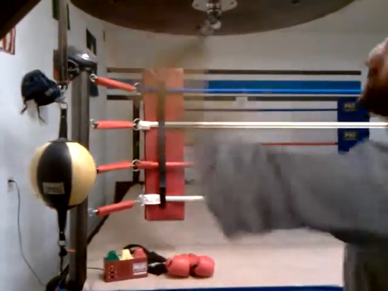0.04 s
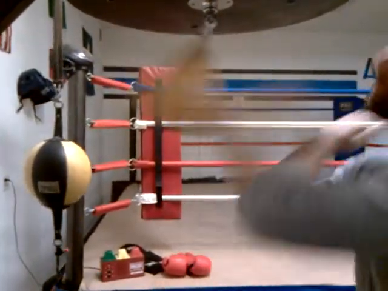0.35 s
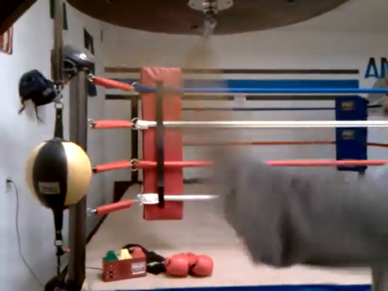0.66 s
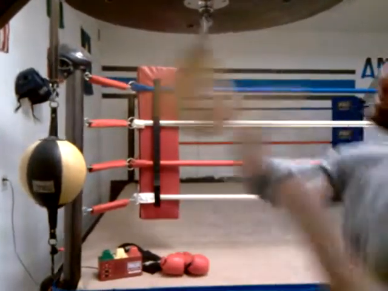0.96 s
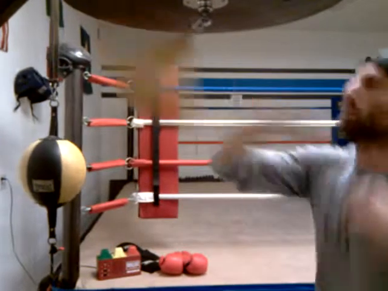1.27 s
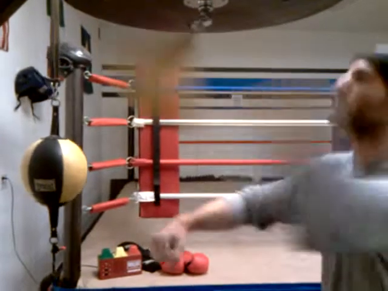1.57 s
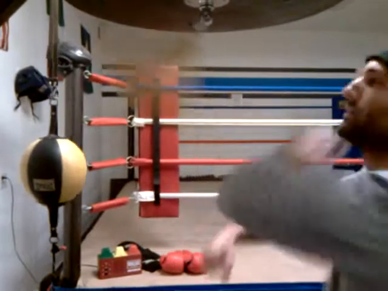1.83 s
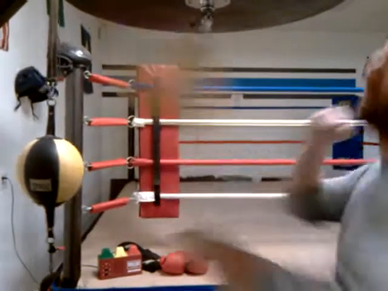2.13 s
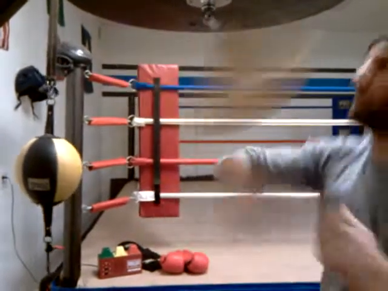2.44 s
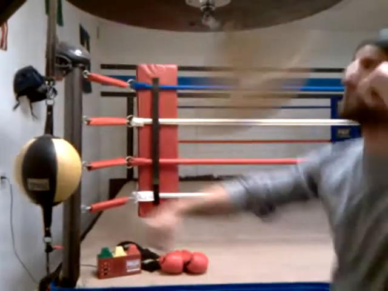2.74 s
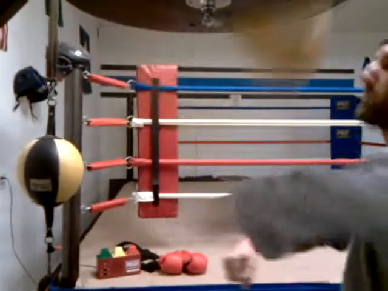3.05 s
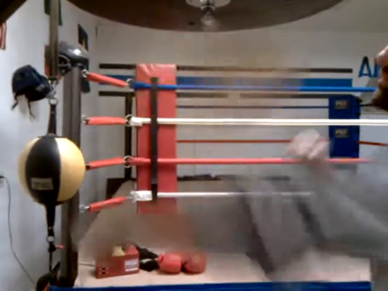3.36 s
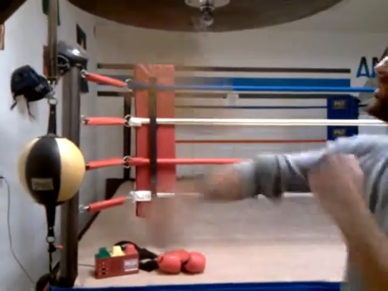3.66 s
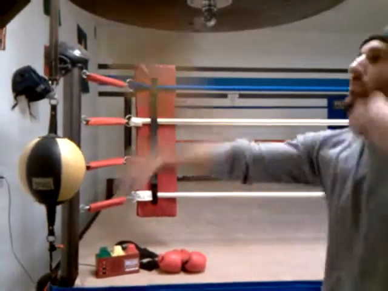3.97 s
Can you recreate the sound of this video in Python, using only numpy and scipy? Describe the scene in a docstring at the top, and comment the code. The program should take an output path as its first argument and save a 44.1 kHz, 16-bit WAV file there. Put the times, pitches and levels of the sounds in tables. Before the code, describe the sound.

Close to the microphone, a speed bag drums against its wooden platform in a fast, even rhythm: a punch, a rattling slam, two softer bounces. Its swivel squeaks now and then, and the gym reverberates over a low rumble.

```python
"""Speed bag in a boxing gym

Close up, from a small camera's microphone: a speed bag is punched about three times a second.
After each punch it strikes the wooden platform three times: a slam that rattles the mount, then
two lighter rebounds. The swivel clatters and squeaks, and the room answers over a low rumble.
The narrow-band recorder overloads on the hardest blows."""
import sys
import numpy as np
from scipy import signal
from scipy.fft import rfft, irfft
from scipy.io import wavfile
from scipy.ndimage import uniform_filter1d, map_coordinates

SR = 44100
rng = np.random.default_rng(int(sys.argv[2]) if len(sys.argv) > 2 else 0)


def wav_out(sig):
    """Save sig, one row per channel (or a flat mono array), as 16-bit PCM at SR to the path in sys.argv[1]."""
    wavfile.write(sys.argv[1], SR, np.round(np.clip(np.atleast_2d(sig).T, -1, 1) * 32767).astype(np.int16))


N = 176400

# spectra of the background rumble and of the room's tail (f/Hz, level/dB)
RUMBLE_EQ = [(20, -4), (50, -3.5), (80, 2.5), (120, -15.5), (300, -4), (1000, -11.5), (3500, -36)]
ROOM_EQ = [(25, -24), (55, -7), (76, -6.5), (110, -1.5), (200, -2.5), (340, 1.5), (480, 2.5), (900, 2),
           (1600, -1), (2100, 2), (2700, -1.5), (3300, 1), (4000, -4.5)]
# reflections off nearby surfaces (delay/s, bass/dB, treble/dB)
REFLECTIONS = [(.0082, -40, -12.5), (0.0147, -39, -13), (0.016, -25.5, -19.5), (0.0302, -18, -39),
               (0.0365, -9.5, -39), (0.0638, -14.5, -28)]
# small clatters: the swivel as the bag swings back, and twice a second knuckle contact
# just after a punch (t/s, level/dB)
SMALL_CLATTERS = [(.53, -16), (.7, -16.5), (.836, -22.5), (1.005, -20.5), (1.159, -22.5), (1.478, -23),
                  (1.808, -19), (2.125, -22.5), (2.453, -25.5), (2.789, -26.5), (3.119, -28.5),
                  (3.443, -22.5), (3.777, -27.5)]
# swivel squeaks (t/s, length/s, f/Hz, level/dB)
SWIVEL_SQUEAKS = [(0.543, 0.032, 3300, -19.5), (0.759, 0.015, 3375, -11), (0.98, 0.014, 2202, -10),
                  (1.62, 0.0075, 2288, -18), (2.252, 0.012, 2340, -22), (2.814, 0.018, 3300, -15.5),
                  (3.583, 0.01, 2200, -13.5), (3.587, 0.014, 3180, -21), (3.837, 0.0081, 2340, -21),
                  (3.946, 0.022, 2346, -20)]
# fist on bag, relative levels (t/s, thump/dB, smack/dB, hollow knock/dB)
FIST_HITS = [(0.0628, -14.5, -24, -10), (0.3668, -14.5, -20.5, -16), (0.6855, -12, -20, -19),
             (0.988, -14.5, -17, -11), (1.3128, -16, -18.5, -14), (1.6442, -13.5, -18.5, -16),
             (1.969, -13.5, -23.5, -27), (2.2826, -15, -18.5, -10), (2.6167, -13.5, -19.5, -16),
             (2.9544, -15, -13, -22.5), (3.2844, -13, -18, -11.5), (3.595, -16, -22, -40),
             (3.9556, -14.5, -19, -9)]
# bag on platform, relative levels (t/s, thump/dB, slap/dB, mount rattle/dB)
BOARD_HITS = [(-0.0045, -16, -9.5, -25.0), (0.0887, -3, -9.5, -13.5), (0.175, -10, -8, -20.5),
              (0.2937, -16, -10.5, -24), (0.401, -3.5, -7.5, -10.5), (0.487, -10.5, -9, -22.5),
              (0.61, -16.5, -10, -25.5), (0.7163, -2.5, -7.3, -11.5), (0.7983, -9, -8.5, -19),
              (0.9104, -15, -8.7, -26), (1.027, -3.5, -7.5, -12), (1.116, -10, -6.5, -21.5),
              (1.2416, -18.5, -8.5, -27.5), (1.3452, -4, -8, -10.5), (1.438, -9.4, -7, -26),
              (1.5702, -16.2, -11.5, -30.5), (1.6762, -4, -6.5, -12), (1.7677, -10.5, -8.2, -21),
              (1.897, -15.5, -10, -28.5), (1.9974, -3.5, -8.5, -13), (2.0828, -10, -12.5, -20.5),
              (2.2032, -19, -6, -29), (2.3229, -5.2, -5.5, -13), (2.4128, -9, -8, -23),
              (2.54, -17.1, -7, -28), (2.652, -5, -4.5, -13), (2.7471, -10, -7, -22.5),
              (2.8823, -17, -9, -34), (2.9834, -5, -4, -14), (3.0757, -8.5, -8.5, -22),
              (3.2074, -16.8, -9.5, -28.5), (3.3141, -2.5, -10, -10.5), (3.399, -10, -9.5, -20.5),
              (3.5174, -14.5, -7.5, -31), (3.6358, -7.5, -6, -16), (3.741, -13, -10, -23.5),
              (3.8841, -20.5, -11, -29.5), (3.9842, -5.5, -7.5, -11.5)]
# modes of the bag's air, its shell, the board, and the longer-ringing mount (f/Hz, level/dB, T60/s)
BAG_AIR_MODES = [(92.8, -2, 0.076), (119, 6.5, 0.02)]
SHELL_MODES = [(380, -1.6, 0.023), (640, -0.77, 0.028)]
BOARD_MODES = [(104.5, -1.5, 0.08), (186.8, 3.5, 0.03), (232.8, -11, 0.056)]
MOUNT_RINGS = [(268, 2, .2), (440, -3, .09), (500, -1, .22), (645, -5, .15), (986, -5, .12),
               (1505, -3, .15), (2018, -4, .12), (2370, -5, .12), (2940, -5, .12), (3238, -1, .15)]
# spectra of fist on leather, leather on wood, loose hardware, mount on its stop (f/Hz, level/dB)
SMACK_EQ = [(100, -3.5), (300, -0.5), (520, -4.5), (720, -0.5), (1250, -7), (1900, 3), (2700, -8),
            (3300, -0.5), (3800, -7)]
SLAP_EQ = [(100, -22.5), (300, -1.5), (520, -1), (950, -4), (1300, -1.5), (1750, 1), (2700, 1.5), (3300, 2),
           (3800, 2)]
RATTLE_EQ = [(100, -15.5), (200, 0.5), (270, 6), (345, -2), (490, 3), (750, -3), (1050, 1.5), (1700, 0),
             (2700, -2.5), (3280, 3), (3800, -5)]
CLACK_EQ = [(300, -9), (1500, -9.5), (2500, 3), (3300, 3)]
# response of the microphone, and of the recorder after it clips (f/Hz, gain/dB)
MIC_EQ = [(100, 1), (3450, 2), (3700, 1), (3900, -14.5), (4250, -16), (4550, -44), (5200, -59),
          (8000, -89.5)]
RECORDER_EQ = [(100, 0.73), (4000, -1), (5000, -5), (6300, -5.5), (8000, -3), (12000, -4.5)]

LEAD_S = 0.3  # run-in before the scene opens
T = np.arange(int(0.4 * SR)) / SR  # time within one hit
RUMBLE_DB, ECHO_DRIFT_S = -33.5, 0.0003
ROOM_DB, ROOM_T60_S, ROOM_BUILD_S, ROOM_SHIFT_S = -7.5, 0.75, 0.0075, 0.1
BOOM_HZ, BOOM_T60_S, BOOM_DB = 107.5, 0.36, -5.5  # standing wave of the room
CLICKS_PER_S, SQUEAK_SAG, SQUEAK_WOBBLE = 2500, 0.02, 0.044
PUNCH_DB, SMACK_DB, SMACK_TAIL_DB = -1, 5.5, 3
THUMP_DB, SLAP_DB, RING_DB, RATTLE_DB = -2.5, 1, -28.5, 2
SWAY_HZ, SWAY_T60_S, SWAY_DB = 35, 0.17, -35  # the whole platform on its bracket
SLAP_HOLD_S, SLAP_DECAY_S, SLAP_TILT_DB = 0.002386, 0.0012, 0.5
SQUASH_S = 0.0042  # a hard blow flattens the bag, so its slap dies more slowly
RATTLE_DELAY_S, CLACK_DELAY_S, CLACK_DECAY_S = 0.0055, 0.011, 0.0019
LOW_CUT_HZ, TOP_HZ, CLIP_DB, CLIP_HARDNESS = 29, 15800, -3.3, 16


def undb(db):
    """Decibels to gain."""
    return 10 ** (np.asarray(db) / 20)


def unit(x, span_s):
    """Scale to rms 1 over the opening span."""
    return x / np.sqrt(np.mean(x[:int(span_s * SR)] ** 2) + 1e-12)


def add(track, s, x):
    """Mix a sound in at s seconds after the run-in."""
    i = int((s + LEAD_S) * SR)
    part = x[:max(len(track) - i, 0)]
    track[i:i + len(part)] += part


def through(x, response):
    """Convolve, keeping the length."""
    return signal.fftconvolve(x, response)[:len(x)]


def colour(x, points, size=4096):
    """Minimum-phase filter through (f/Hz, gain/dB) points."""
    hz, db = np.array(points, float).T
    f = np.arange(size // 2 + 1) * SR / size + 1
    cepstrum = irfft(np.log(undb(np.interp(np.log(f), np.log(hz), db))))
    cepstrum[1:size // 2] *= 2
    cepstrum[size // 2 + 1:] = 0
    return through(x, irfft(np.exp(rfft(cepstrum))))


def soften(x):
    """Roll off above 4.3 kHz, as heard through the narrow-band recorder."""
    return signal.sosfilt(signal.butter(6, 4300, fs=SR, output="sos"), x)


def burst(hold_s, decay_s):
    """Envelope that holds, then dies away."""
    return np.exp(-np.maximum(T - hold_s, 0) / decay_s)


def even_burst(envelope):
    """A short noise burst with its spectrum evened out: a broad slap without pitch."""
    x = rng.standard_normal(len(T)) * envelope
    for _ in range(3):
        x = irfft(np.exp(1j * np.angle(rfft(x))), len(T)) * envelope
    return soften(x)


def ring(modes, detune):
    """Decaying modes struck from rest, neighbours swinging in opposite directions."""
    out = np.zeros(len(T))
    for k, (hz, db, t60) in enumerate(modes):
        pitch = hz * (1 + detune * rng.standard_normal())
        out += (-1) ** k * undb(db) * np.sin(2 * np.pi * pitch * T) * np.exp(-np.log(1000) * T / t60)
    return out


def room_tone(n):
    """A steady low rumble behind everything."""
    rumble = colour(soften(rng.standard_normal(n)), RUMBLE_EQ)
    return undb(RUMBLE_DB) * rumble / rumble.std()


def gym(bass, treble):
    """Direct sound, a standing wave, and reflections and a tail that shift as boxer and bag move."""
    direct = bass + treble
    n = len(direct)
    near, samples = direct.copy(), np.arange(n)
    for delay, bass_db, treble_db in REFLECTIONS:
        drift = np.interp(samples, np.linspace(0, n, 30), rng.standard_normal(30))
        moved = map_coordinates(treble, [samples + ECHO_DRIFT_S * SR * drift], order=1)
        add(near, delay - LEAD_S, undb(bass_db) * bass + undb(treble_db) * moved)
    t = np.arange(SR) / SR
    fade = np.exp(-np.log(1000) * t / ROOM_T60_S) * (1 - np.exp(-(t / ROOM_BUILD_S) ** 2))
    fade /= np.linalg.norm(fade)
    hop, tail = int(ROOM_SHIFT_S * SR), np.zeros(n)
    for i in range(0, n, hop):  # each overlapping stretch gets its own diffuse tail
        part = direct[i:i + 2 * hop]
        part = part * np.sin(np.pi * np.arange(len(part)) / (2 * hop))
        add(tail, i / SR - LEAD_S, signal.fftconvolve(part, fade * rng.standard_normal(SR)))
    boom_fade = np.exp(-np.log(1000) * t / BOOM_T60_S)
    boom = 2 * boom_fade / boom_fade.sum() * np.cos(2 * np.pi * BOOM_HZ * t)
    return near + undb(ROOM_DB) * colour(tail, ROOM_EQ) + undb(BOOM_DB) * through(direct, boom)


def chatter(hold_s, decay_s):
    """Loose hardware: a dying shower of uneven clicks through the board."""
    clicks = (rng.random(len(T)) < CLICKS_PER_S / SR) * rng.choice([-1, 1], len(T))
    shower = soften(clicks * burst(hold_s, decay_s))
    return unit(colour(shower, RATTLE_EQ), span_s=0.023)


def swivel_and_knuckles(n):
    """The joint clatters and gives short, unsteady, falling squeaks; two clatters are knuckles."""
    out = np.zeros(n)
    for s, db in SMALL_CLATTERS:
        add(out, s, undb(db) * chatter(hold_s=0.0091, decay_s=0.0076))
    for s, length, hz, db in SWIVEL_SQUEAKS:
        along = np.minimum(T / length, 1)
        wobble = uniform_filter1d(rng.standard_normal(len(T)), size=90)
        pitch = hz * (1 - SQUEAK_SAG * (along - 0.5) + SQUEAK_WOBBLE * wobble / wobble.std())
        add(out, s, undb(db) * np.sin(np.pi * along) * np.sin(2 * np.pi * np.cumsum(pitch) / SR))
    return out


def fists(n):
    """A punch rings the air in the bag and knocks its shell; the dull smack tugs at the swivel."""
    bass, treble = np.zeros((2, n))
    for s, thump_db, smack_db, knock_db in FIST_HITS:
        thump = unit(ring(BAG_AIR_MODES, detune=0.017), span_s=0.015)
        add(bass, s, undb(thump_db + PUNCH_DB) * thump)
        envelope = burst(0.0016, 0.0033) + undb(SMACK_TAIL_DB) * burst(0.012, 0.026)
        smack = colour(even_burst(envelope), SMACK_EQ)
        add(treble, s, undb(smack_db + SMACK_DB) * unit(smack, span_s=0.0054))
        add(treble, s, undb(knock_db) * ring(SHELL_MODES, detune=0.072))
    return bass, treble


def platform(n):
    """Each strike flexes the board, slaps leather on wood and shakes the mount."""
    bass, treble = np.zeros((2, n))
    for s, thump_db, slap_db, rattle_db in BOARD_HITS:
        flex = unit(ring(BOARD_MODES, detune=0.024), span_s=0.01)
        sway = ring([(SWAY_HZ, SWAY_DB, SWAY_T60_S)], detune=0.13)
        add(bass, s, undb(thump_db + THUMP_DB) * (flex + sway))
        tilt = SLAP_TILT_DB * rng.standard_normal()  # brightness varies from hit to hit
        envelope = burst(SLAP_HOLD_S, SLAP_DECAY_S + SQUASH_S * undb(thump_db))
        slap = colour(even_burst(envelope), [(hz, db + tilt * np.log10(hz)) for hz, db in SLAP_EQ])
        add(treble, s, undb(slap_db + SLAP_DB) * unit(slap, span_s=0.0031))
        add(treble, s, undb((slap_db + thump_db) / 2 + RING_DB) * ring(MOUNT_RINGS, detune=0.006))
        rattle = chatter(hold_s=0.008, decay_s=0.013)
        add(treble, s + RATTLE_DELAY_S, undb(rattle_db + RATTLE_DB) * rattle)
        # the lifted mount drops back on its stop
        clack = colour(even_burst(burst(0, CLACK_DECAY_S)), CLACK_EQ)
        add(treble, s + CLACK_DELAY_S, undb(rattle_db) * unit(clack, span_s=2 * CLACK_DECAY_S))
    return bass, treble


def scene():
    """At the microphone: bag, platform and swivel close by, the gym and its rumble behind."""
    n = N + int(LEAD_S * SR)
    fist_bass, fist_treble = fists(n)
    board_bass, board_treble = platform(n)
    rumble = room_tone(n)
    workout = gym(fist_bass + board_bass, fist_treble + board_treble + swivel_and_knuckles(n))
    return (rumble + workout)[None, -N:]


def record(dry):
    """The camera's narrow-band microphone path; loud peaks clip, which adds the only high treble."""
    low_cut = signal.butter(1, LOW_CUT_HZ, "high", fs=SR, output="sos")
    high_cut = signal.ellip(8, 0.2, 70, TOP_HZ, fs=SR, output="sos")
    mic = colour(signal.sosfilt(low_cut, dry[0]), MIC_EQ)
    clipped = mic / (1 + np.abs(mic / undb(CLIP_DB)) ** CLIP_HARDNESS) ** (1 / CLIP_HARDNESS)
    return signal.sosfilt(high_cut, colour(clipped, RECORDER_EQ))[None]


dry = scene()
out = record(dry)
wav_out(out)
```